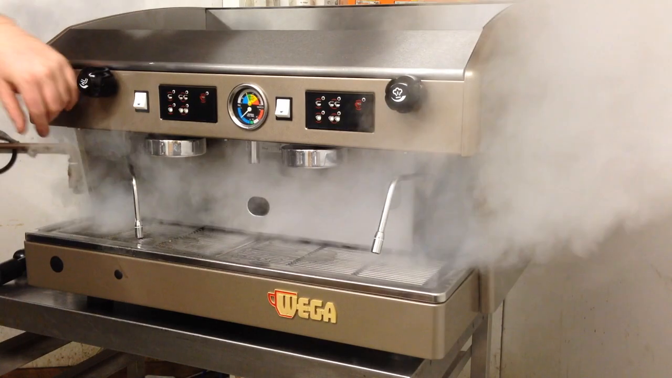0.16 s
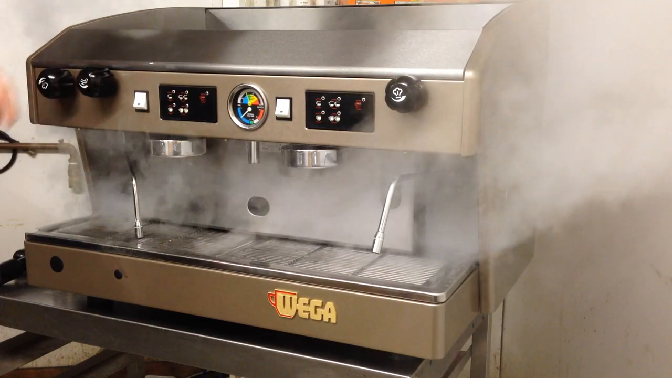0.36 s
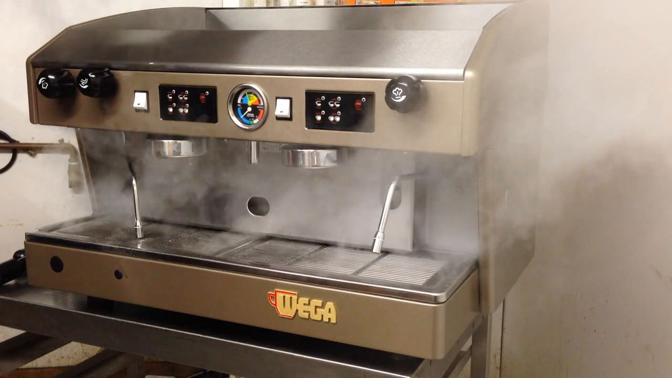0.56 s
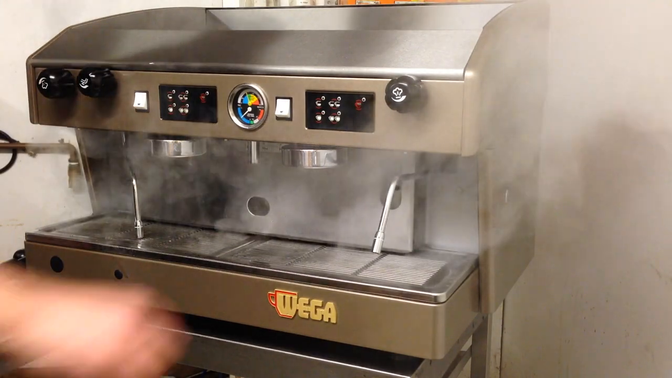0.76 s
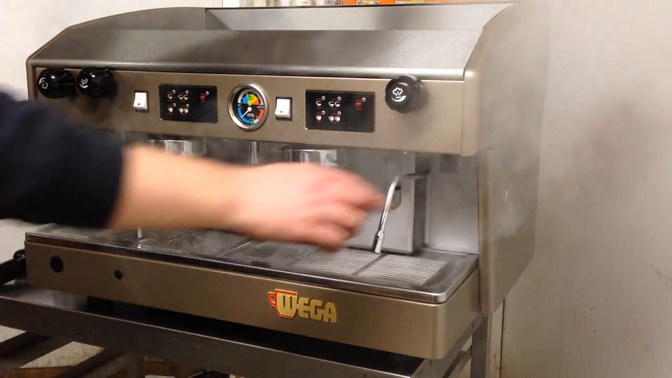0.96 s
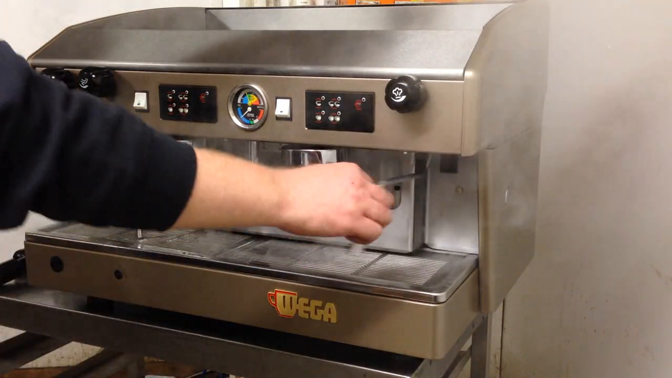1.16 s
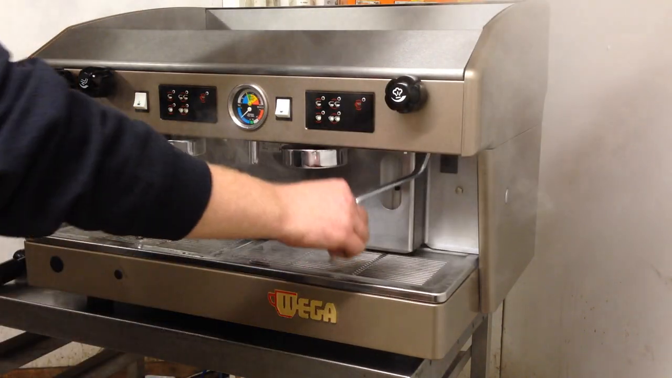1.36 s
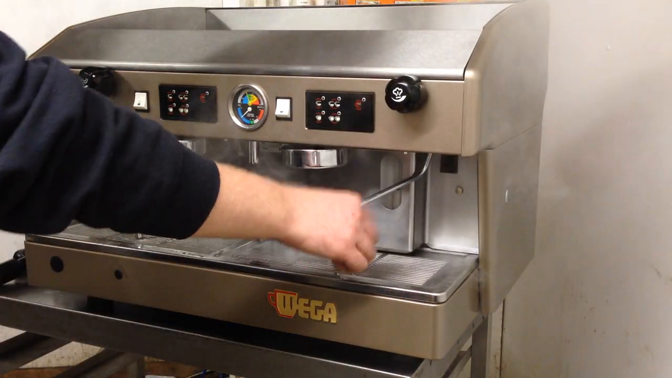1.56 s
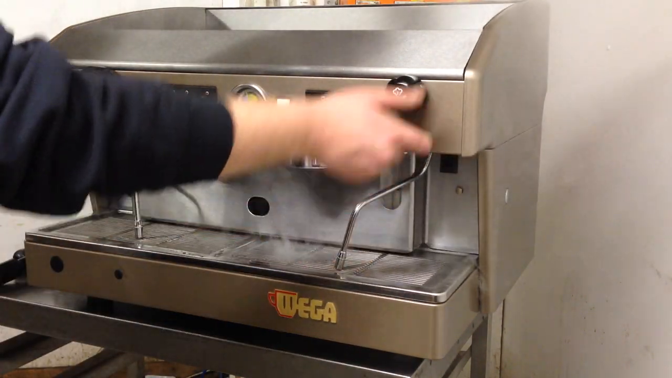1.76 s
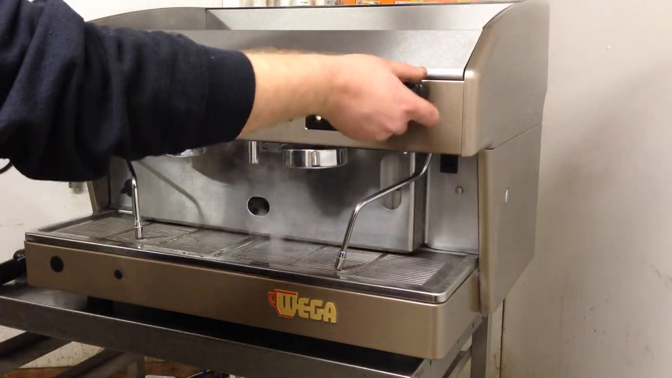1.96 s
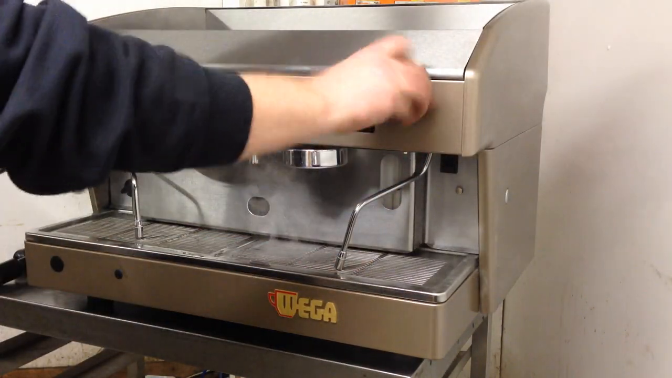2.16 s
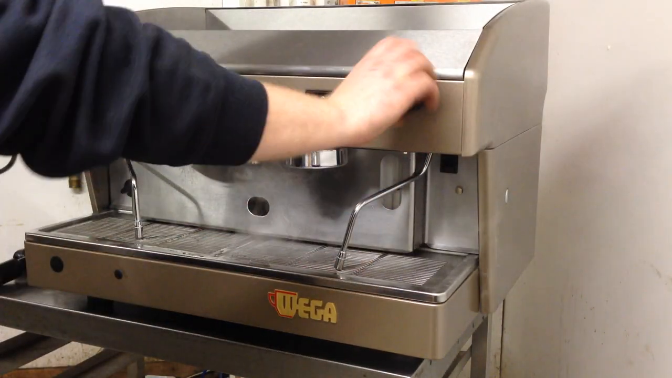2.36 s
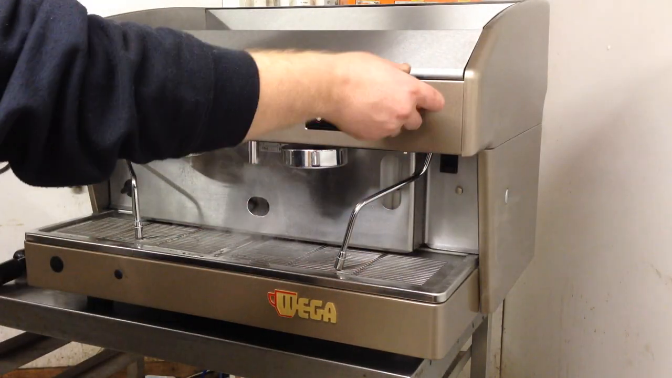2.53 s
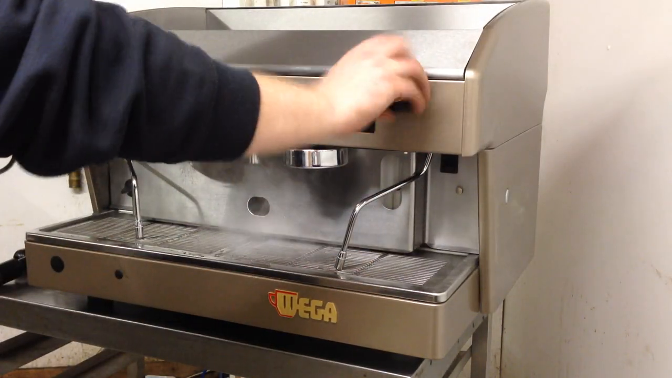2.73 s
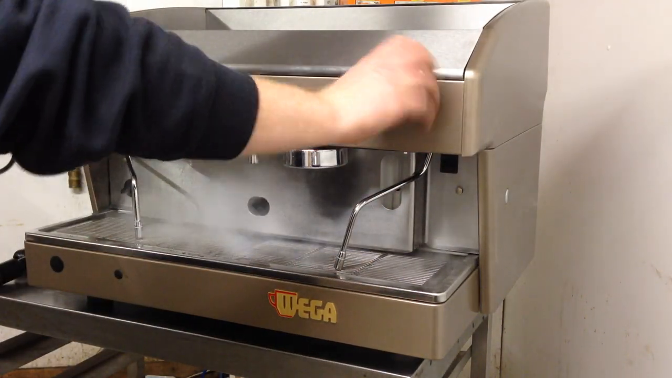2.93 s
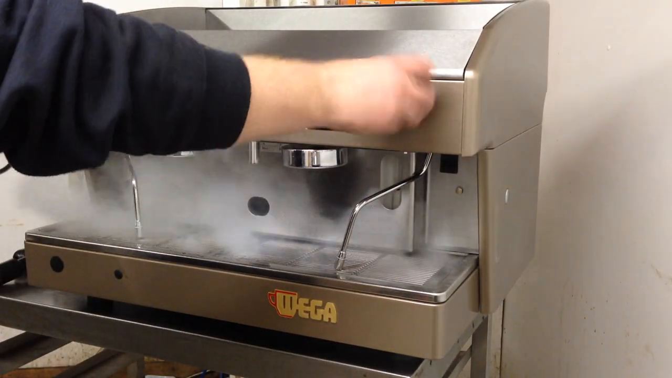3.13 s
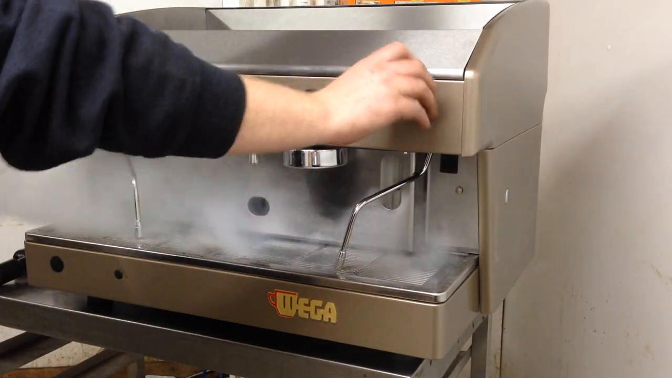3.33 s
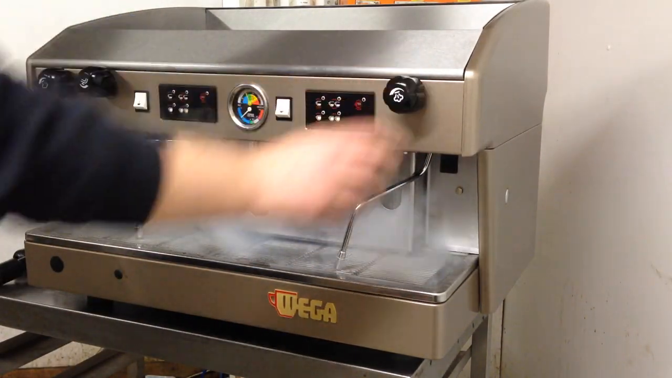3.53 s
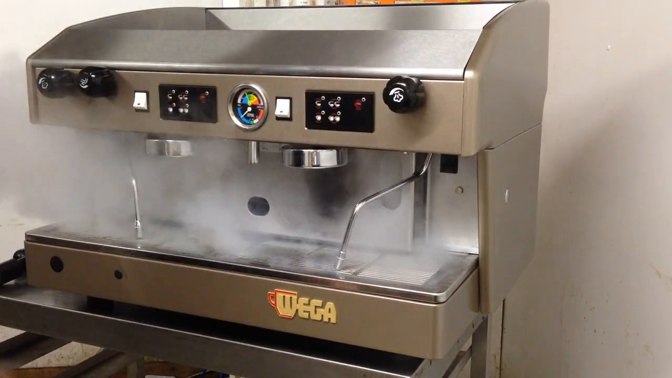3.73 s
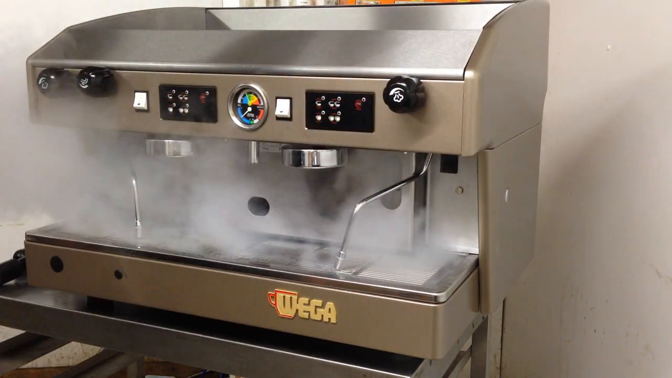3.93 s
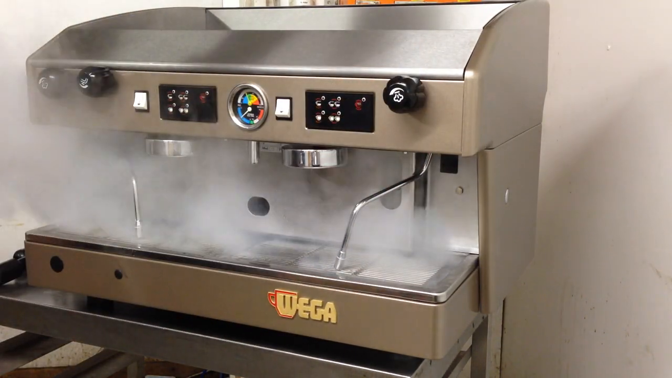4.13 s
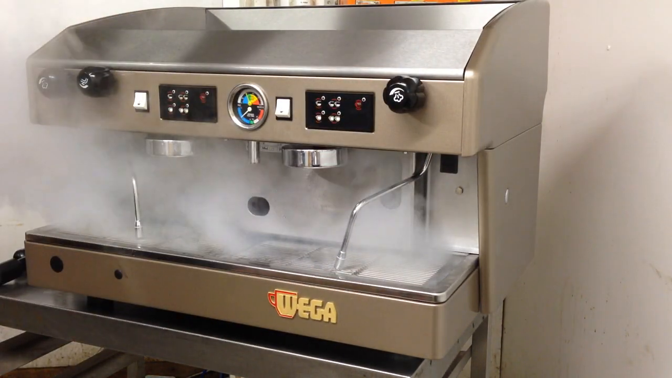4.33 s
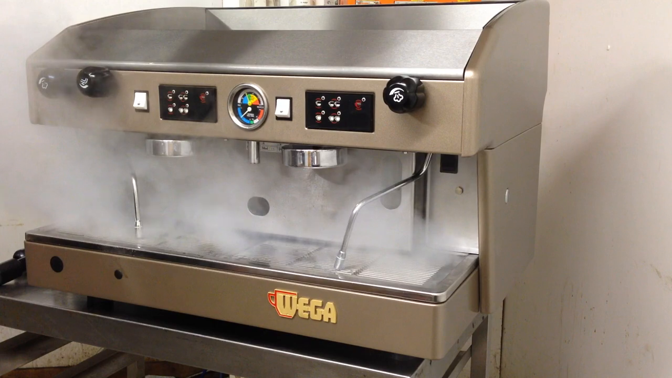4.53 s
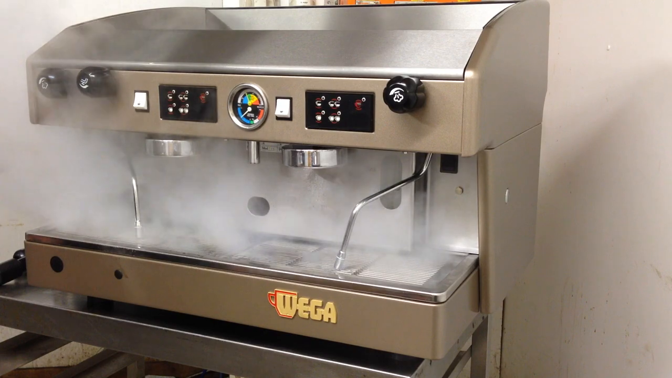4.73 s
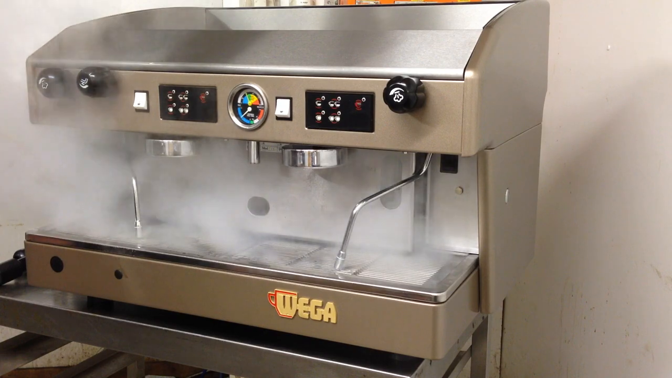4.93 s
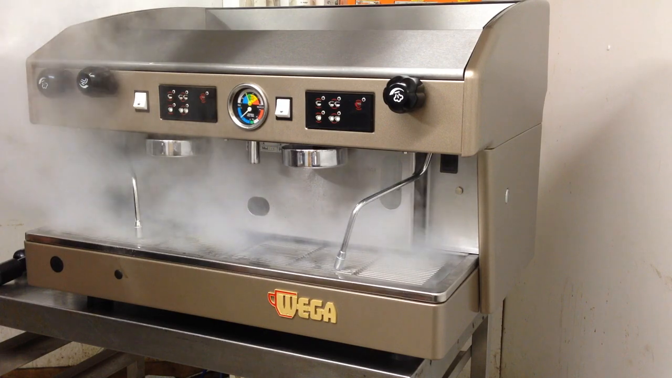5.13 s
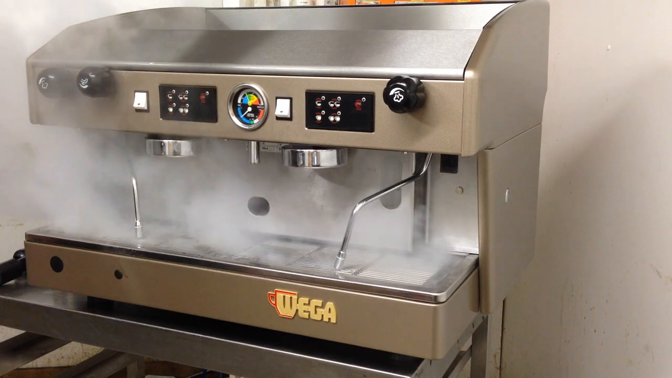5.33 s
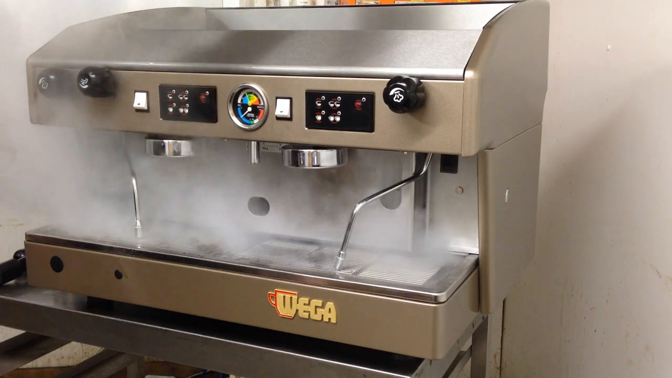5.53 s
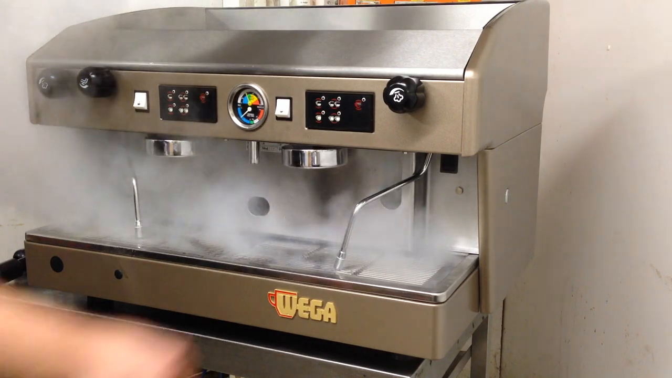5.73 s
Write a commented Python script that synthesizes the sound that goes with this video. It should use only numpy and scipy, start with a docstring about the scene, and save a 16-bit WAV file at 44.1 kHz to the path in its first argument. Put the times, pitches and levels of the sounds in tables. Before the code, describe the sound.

At the start, the hiss of an espresso machine's steam wand drops quickly and bleeds away over about a second, leaving quiet room noise and a very faint hum. A faint metal tick comes at about 0.4 seconds, a dull panel thud at 0.9 with a slight sleeve rustle, and a bright, briefly ringing clack of the wand joint at 1.5. At about 2.2 seconds the second valve opens: water spatters on the drip tray and several short spits of steam break through. Around 2.7 seconds, with another soft low thud, the full jet arrives. It is a loud, bright hiss with a fluttering rush on the tray and faint unsteady whistles, strongest near 3.3 seconds and steady until the end, just before 6 seconds. The microphone is close to the wands in a small hard room with a short reverberation.

```python
"""Espresso machine in a small hard room, one microphone close to the steam wands.
One wand dies away; faint metal ticks, a dull thud and the clack of the wand joint follow.
Just after two seconds the second valve opens: condensed water spatters on the drip tray and spits of
steam break through. With one more thud the full jet arrives, then hisses steadily between the steel
walls of the machine to the end."""
import sys
import numpy as np
from scipy import signal
from scipy.fft import rfft, irfft, next_fast_len
from scipy.io import wavfile
from scipy.ndimage import uniform_filter1d, map_coordinates

SR = 44100
rng = np.random.default_rng(int(sys.argv[2]) if len(sys.argv) > 2 else 0)


def generate_wav(signal):
    """Clip the signal to [-1, 1] and save it as 16-bit WAV at the path in sys.argv[1]."""
    frames = np.transpose(np.atleast_2d(signal))
    scaled = np.clip(frames, -1, 1) * 32767
    pcm = np.round(scaled).astype(np.int16)
    wavfile.write(sys.argv[1], SR, pcm)


N = 254898
TIME_S = np.arange(N) / SR


# hiss of the jet at the nozzle: frequency_hz, density_db
JET_SPECTRUM = [(1470, -31), (2500, -4.5), (3550, -2.5), (4480, -1.5), (6500, 0.5), (8000, -2),
                (9200, -0.5), (10500, -3), (12800, -1.5), (14000, -1.5), (14500, -0.5), (15100, 0),
                (16000, -6.5)]
def steam():
    """Turbulent jets from both wands hiss, rush and roar on the tray inside the steel bay."""
    closing = closing_wand()
    opening, opening_rush = opening_wand()
    water = water_gushes()
    hiss_gain = closing + opening + amp(-22) * water + spits()
    rush_gain = amp(-9) * closing + opening_rush
    roar_gain = amp(-16.5) * closing + amp(-22) * opening + amp(-9.5) * water + first_blast()
    surge = amp(0.3 * wobble(9) + 0.5 * wobble(30))  # uneven flow, shared by hiss, rush and roar
    hiss = hiss_gain * noise(JET_SPECTRUM, patchy_db=0.9)
    flow = surge * (hiss + tray_rush(rush_gain) + tray_roar(roar_gain))
    in_bay = steel_bay(flow + spatter(water))
    return amp(-1.5) * room(in_bay + hiss_gain * droplet_pings(), wet_db=-11)


# flow through the second valve: time_s, hiss_db, rush_over_hiss_db
VALVE_OPENING = [(2.48, -68, 2), (2.55, -41.5, 2.5), (2.62, -42.5, 0), (2.72, -26.5, -11),
                 (2.86, -24, -5.5), (3.25, -22, -8), (3.8, -23, -11.5), (4.04, -24.5, -9), (4.55, -24, -10),
                 (5.4, -25, -11), (5.78, -25, -8)]
def opening_wand():
    """Gains of the jet's hiss and of its rush on the tray as the valve opens and stays open."""
    time_s, hiss_db, rush_over_hiss_db = np.transpose(VALVE_OPENING)
    return gain_curve(time_s, hiss_db), gain_curve(time_s, hiss_db + rush_over_hiss_db)


# dying flow of the first wand: start_db, fall_db_per_s
SHUT_OFF_DECAYS = [(-37, 159), (-44.5, 28.5)]
def closing_wand():
    """Gain of the wand that is shut off: a quick drop and a slow bleed add up."""
    return sum(amp(db - fall_db_per_s * TIME_S) for db, fall_db_per_s in SHUT_OFF_DECAYS)


# spits of steam through the water: start_s, level_db, length_s
STEAM_SPITS = [(2.224, -31.5, 0.022), (2.5077, -47, 0.0073), (2.54, -25, 0.0078), (2.5824, -52, 0.0068),
               (2.6, -38, 0.01), (2.642, -25.5, 0.011)]
def spits():
    """Gain of slugs of steam that swell and are choked again."""
    gain = np.zeros(N)
    for start_s, level_db, length_s in STEAM_SPITS:
        age = np.clip((TIME_S - start_s) / length_s, 0, 30)
        gain += amp(level_db) * age * np.exp(-age * age)
    return gain


# burst of roar on the tray: start_s, hold_s, level_db
TRAY_BLAST = [(2.732, 0.018, -41.5)]
def first_blast():
    """Gain of the extra roar as the jet first fills the tray."""
    return sum(swell(*row, rise_s=0.039, fall_db_per_s=65) for row in TRAY_BLAST)


# bright rush on the tray: frequency_hz, density_db
RUSH_SPECTRUM = [(650, -22.5), (1100, -11), (1530, 0), (2270, 2), (2860, 2), (4090, 4), (4500, -3),
                 (5850, -6.5), (9900, -120)]
def tray_rush(gain):
    """Steam hits the drip tray with a fast-flickering rush."""
    return gain * amp(0.83 * wobble(60)) * noise(RUSH_SPECTRUM, patchy_db=1.3)


# low roar on the tray: frequency_hz, density_db
ROAR_SPECTRUM = [(53, -52), (90, -21.5), (183, -6), (481, -6), (540, -6.5), (771, 0), (854, -2.5),
                 (1400, -6), (1820, -9), (3080, -120)]
def tray_roar(gain):
    """The jet roars on the tray, below its hiss."""
    return gain * noise(ROAR_SPECTRUM, patchy_db=-0.56)


# pings of droplets in the bay: pitch_hz, level_re_hiss_db
DROPLET_PINGS = [(2430, -22.5), (2790, -18.5), (3455, -25.5), (3650, -25.5)]
def droplet_pings():
    """Droplets ping the resonances of the bay: unsteady tones flare up at random while the steam flows."""
    tones = np.zeros(N)
    for pitch_hz, level_db in DROPLET_PINGS:
        flare = amp(6 * wobble(35))
        tones += amp(level_db) * unit(flare * np.sin(2 * np.pi * pitch_hz * TIME_S + 2.5 * wobble(60)))
    return tones


# resonances of the bay above the tray: centre_hz, width_hz, lift_db
BAY_RESONANCES = [(485, 30, 5), (764, 30, 5.5), (1232, 25, 7), (1478, 30, 6), (1796, 30, 5), (2042, 30, 5),
                  (2163, 20, 5), (2430, 30, 5), (2557, 15, 4), (2790, 35, 7), (2960, 50, 4), (3143, 20, 4),
                  (3455, 25, 7), (3655, 45, 5), (4240, 55, 3.5), (5750, 40, 2), (10329, 20, 4)]
def steel_bay(sound):
    """The hollow between the steel walls lifts narrow bands of the sound inside it."""
    def response(hz):
        return 1 + sum((amp(lift_db) - 1) / (1 + (2 * (hz - centre_hz) / width_hz) ** 2)
                       for centre_hz, width_hz, lift_db in BAY_RESONANCES)
    return filtered(sound, response)


# condensed water leaving the wand: start_s, hold_s, level_db
GUSHES = [(2.226, 0.13, -38), (2.42, 0.011, -37.5)]
def water_gushes():
    """Gain of the short gushes of water that come ahead of the steam."""
    return sum(swell(*row, rise_s=0.05, fall_db_per_s=296) for row in GUSHES)


# water landing on the drip tray: frequency_hz, density_db
SPLASH_SPECTRUM = [(53, -51), (90, -33), (184, 4), (270, -10), (375, 2.5), (429, -32), (481, -6), (764, -2),
                   (1080, -9), (1190, 0), (1890, -3), (2470, -1), (3500, -12), (4500, -21), (6360, -18),
                   (9000, -41), (11700, -68), (19800, -120)]
def spatter(gain):
    """Droplets make the splash on the tray grainy."""
    droplets = unit(amp(2.5 * wobble(250) + 1.2 * wobble(40)))
    return gain * droplets * noise(SPLASH_SPECTRUM, patchy_db=1.2)


# blows on a panel: start_s, level_db, pitch_ratio
PANEL_BLOWS = [(0.933, -26.5, 1), (0.995, -39, 1.55), (2.755, -33, 0.62)]
# modes of the panel: pitch_hz, level_db, t60_s
PANEL_MODES = [(124, -10, 0.096), (204.6, 4.5, 0.084), (275, -3.5, 0.11), (398, -4, 0.054),
               (503, -2.5, 0.043), (643, -7, 0.052), (740, -14, 0.12), (1040, -15, 0.054),
               (1370, -26, 0.046)]
def thuds():
    """A struck panel rings low and dies quickly."""
    panel = struck(PANEL_BLOWS, PANEL_MODES, crack_db=-49, crack_t60_s=0.05, blur=10.6, rise_s=0.00089)
    return room(panel, wet_db=-5.5)


# two metal ticks, then the clack of the wand joint: start_s, level_db, pitch_ratio
METAL_BLOWS = [(0.424, -49, 0.71), (0.462, -65, 0.6), (1.5155, -29, 1.01)]
# modes of the metal: pitch_hz, level_db, t60_s
METAL_MODES = [(240, -27, 0.22), (515, -12, .3), (1016, -14, 0.52), (1135, -7, 0.25), (1310, -24, 0.24),
               (2440, -7, 0.27), (2850, -7, 0.27), (3250, -11, 0.45), (4530, -7, 0.26), (6650, 5, 0.074)]
def clacks():
    """Knocked metal cracks and rings brightly."""
    metal = struck(METAL_BLOWS, METAL_MODES, crack_db=-6, crack_t60_s=0.32, blur=22, rise_s=0.0023)
    return room(metal, wet_db=-5)


# noise of an impact: frequency_hz, density_db
CRACK_SPECTRUM = [(88, -41), (150, -9), (234, -4), (273, -7), (591, -10), (718, -27), (775, -22),
                  (997, -13), (1380, -10), (1920, -21), (3000, -12.5), (3930, -16), (6620, -10.5),
                  (12100, -19), (15200, -22)]
def struck(blows, modes, crack_db, crack_t60_s, blur, rise_s):
    """Every blow rings the modes, with a crack of noise; crowded neighbours blur each mode's phase."""
    ring, crack_gain = np.zeros((2, N + SR))
    t = np.arange(SR // 2) / SR
    attack = 1 - np.exp(-t / rise_s)
    for start_s, level_db, pitch_ratio in blows:
        span = round(start_s * SR) + np.arange(len(t))
        for pitch_hz, mode_db, t60_s in modes:
            drift = blur * np.cumsum(rng.standard_normal(len(t))) / np.sqrt(SR)
            envelope = attack * amp(level_db - 8.5 + mode_db - 60 * t / t60_s)
            ring[span] += envelope * np.sin(2 * np.pi * pitch_ratio * pitch_hz * t + drift)
        crack_gain[span] += attack * amp(level_db + crack_db - 60 * t / crack_t60_s)
    return ring[:N] + crack_gain[:N] * noise(CRACK_SPECTRUM, patchy_db=0.4)


# passes of sleeve and hand: start_s, hold_s, level_db, rise_s
SLEEVE_PASSES = [(0.976, 0.11, -62, 0.078), (1.989, 0.046, -57.5, 0.016)]
# rubbing cloth: frequency_hz, density_db
CLOTH_SPECTRUM = [(880, -33), (1500, -6), (2390, -15), (2830, -1), (3710, -7), (6270, -5.5), (7990, -9),
                  (14000, -24)]
def rustle():
    """A sleeve and a hand brush past."""
    gain = sum(swell(*row, fall_db_per_s=51) for row in SLEEVE_PASSES)
    return gain * amp(1.3 * wobble(54)) * noise(CLOTH_SPECTRUM, patchy_db=2.5)


# spells of hum: start_s, hold_s, level_db, pitch_hz
HUM_SPELLS = [(0.387, .4, -69, 290), (1.1, .15, -74, 275), (1.698, 0.2, -67.5, 282),
              (1.894, 0.55, -66.5, 309.6)]
def hum():
    """A faint hum comes and goes, wavering in pitch and level."""
    waver = 2 * np.pi * np.cumsum(6 * wobble(30)) / SR
    flutter = amp(3 * wobble(10))
    tones = np.zeros(N)
    for start_s, hold_s, level_db, pitch_hz in HUM_SPELLS:
        gain = swell(start_s, hold_s, level_db, rise_s=0.046, fall_db_per_s=47)
        tones += gain * np.sin(2 * np.pi * pitch_hz * TIME_S + waver)
    return np.sqrt(2) * flutter * tones


# tones of the machine: pitch_hz, level_db
MACHINE_WHINES = [(1590, -82), (1975, -81)]
def whine():
    """The machine whines faintly, unsteady in level and phase."""
    return sum(amp(db + 2.1 * wobble(5.2)) * np.sin(2 * np.pi * hz * TIME_S + 2.1 * wobble(40))
               for hz, db in MACHINE_WHINES)


# air movement at the microphone: time_s, level_db
BUFFET_LEVELS = [(0.0, -77), (1.1, -80), (2.3, -71), (2.85, -64), (3.3, -65), (3.6, -92), (5.78, -89)]
def buffeting():
    """Moving air rumbles on the microphone, most as the jet opens."""
    spectrum = [(15, -38), (30, -16), (50, 16), (75, 7), (110, -27), (200, -77)]
    gusts = amp(2.5 * wobble(2.6))
    return gain_curve(*np.transpose(BUFFET_LEVELS)) * gusts * noise(spectrum, patchy_db=0)


# background of the room: frequency_hz, density_db
ROOM_TONE_SPECTRUM = [(47, -34), (80, 1.5), (386, 3.5), (718, -5), (1600, -3.5), (1740, -3.5), (2330, -3),
                      (2900, -6.5), (14000, -17), (15000, -24), (16000, -41)]
def room_tone():
    """Quiet, mostly low noise lies under everything."""
    return amp(-60.5) * noise(ROOM_TONE_SPECTRUM, patchy_db=2.7)


# reverberation of the small hard room: frequency_hz, t60_s
ROOM_DECAY = [(150, 0.24), (400, 0.78), (1040, 0.45), (2760, 0.33), (7280, 0.31)]
def room(direct, wet_db):
    """The direct sound reaches the microphone, then a tail in which each frequency dies at its own rate."""
    hz, t, bins = signal.stft(rng.standard_normal(SR // 2), SR, nperseg=256)
    decay = amp(-60 * t / along(ROOM_DECAY, hz)[:, None])
    tail = signal.istft(bins * decay, SR, nperseg=256)[1]
    tail = signal.lfilter([1], [1, -0.45], tail)  # walls and steam soak up treble
    delayed = np.pad(direct, (200, 0))
    return direct + amp(wet_db) * signal.fftconvolve(delayed, tail / np.linalg.norm(tail))[:N]


def noise(spectrum, patchy_db):
    """Noise of rms 1 shaped by (frequency_hz, density_db) points, with patches of random gain."""
    bins = signal.stft(rng.standard_normal(N), nperseg=512)[2]
    patches = uniform_filter1d(rng.standard_normal(bins.shape), size=6, axis=0)
    patches = uniform_filter1d(patches, size=10, axis=1)
    patchy = signal.istft(bins * amp(patchy_db * unit(patches)), nperseg=512)[1][:N]
    return unit(filtered(patchy, lambda hz: amp(along(spectrum, hz))))


def swell(start_s, hold_s, level_db, rise_s, fall_db_per_s):
    """A gain that rises, holds and dies away."""
    age_s = TIME_S - start_s
    falling_s = np.maximum(age_s - rise_s - hold_s, 0)
    return np.clip(age_s / rise_s, 0, 1) ** 2 * amp(level_db - fall_db_per_s * falling_s)


def gain_curve(time_s, level_db):
    """One gain per sample through the given levels, silent outside them."""
    return amp(np.interp(TIME_S, time_s, level_db, -120, -120))


def wobble(rate_hz):
    """A smooth random curve with rate_hz knots a second."""
    return map_coordinates(rng.standard_normal(int(N * rate_hz / SR) + 4), [TIME_S * rate_hz])


def filtered(x, response):
    """x with its spectrum multiplied by response(hz)."""
    size = next_fast_len(N + SR // 2)
    return irfft(rfft(x, size) * response(np.fft.rfftfreq(size, 1 / SR)), size)[..., :N]


def along(points, hz):
    """Interpolate (frequency_hz, value) points on a log axis."""
    knots_hz, values = np.transpose(points)
    return np.interp(np.log(hz + 1), np.log(knots_hz + 1), values)


def amp(db):
    return 10 ** (np.asarray(db) / 20)


def unit(x):
    return x / np.sqrt(np.mean(x ** 2) + 1e-20)


def scene():
    """Steam, knocks and background meet at one microphone, which feeds both channels."""
    # small objects radiate no deep bass
    knocks = filtered(thuds() + clacks(), lambda hz: (1j * hz / (45 + 1j * hz)) ** 2)
    mono = steam() + knocks + rustle() + hum() + whine() + buffeting() + room_tone()
    return np.tile(mono, (2, 1))


def record(dry):
    """Nothing passes above the band limit of 15.3 kHz."""
    return filtered(dry, lambda hz: hz < 15300)


dry = scene()
out = record(dry)
generate_wav(out)
```